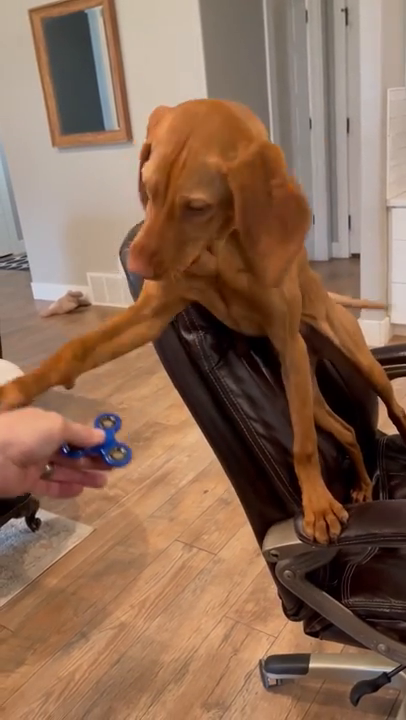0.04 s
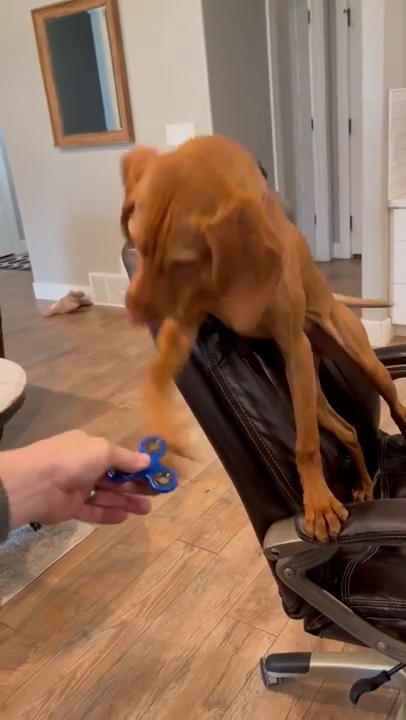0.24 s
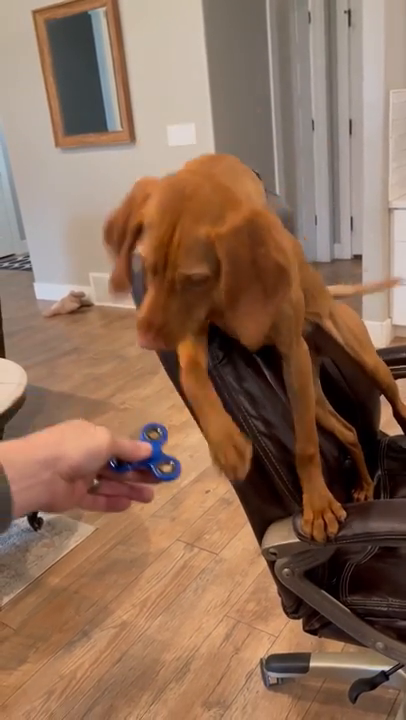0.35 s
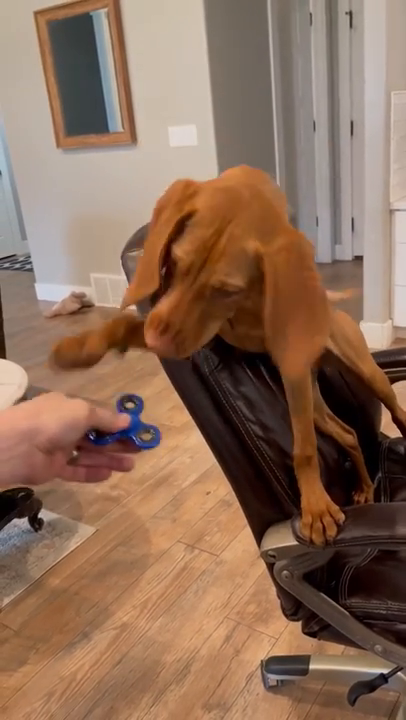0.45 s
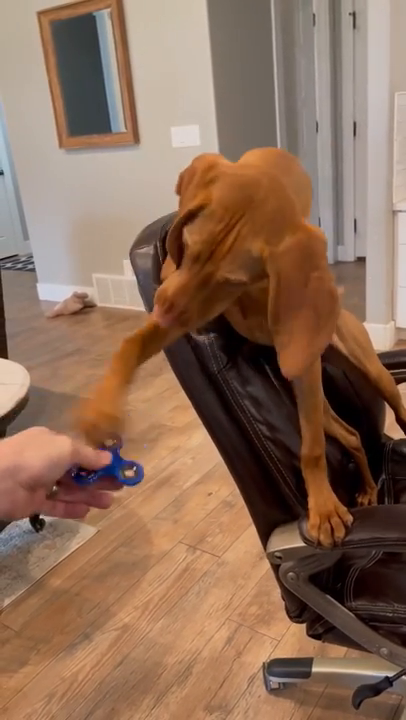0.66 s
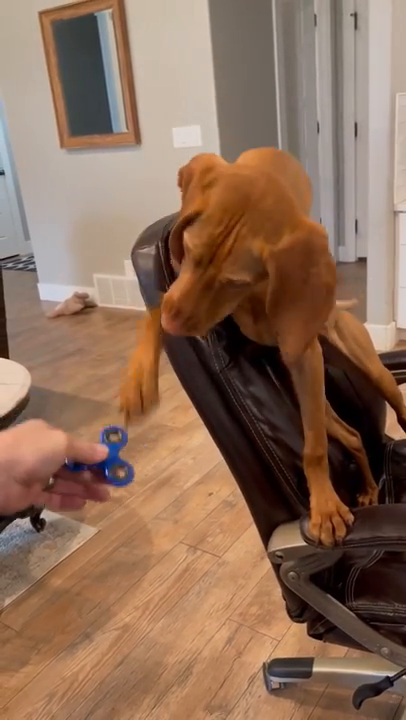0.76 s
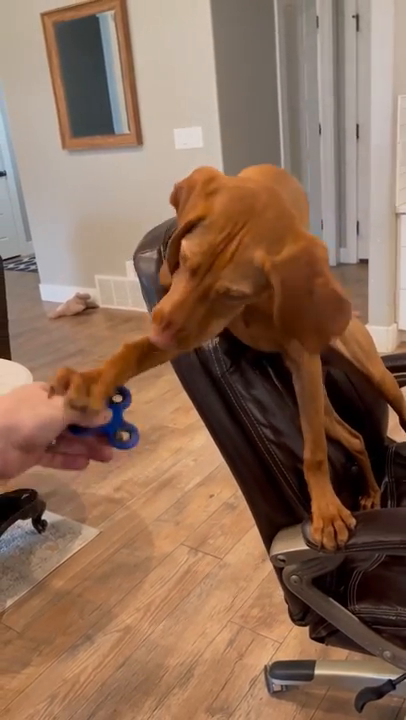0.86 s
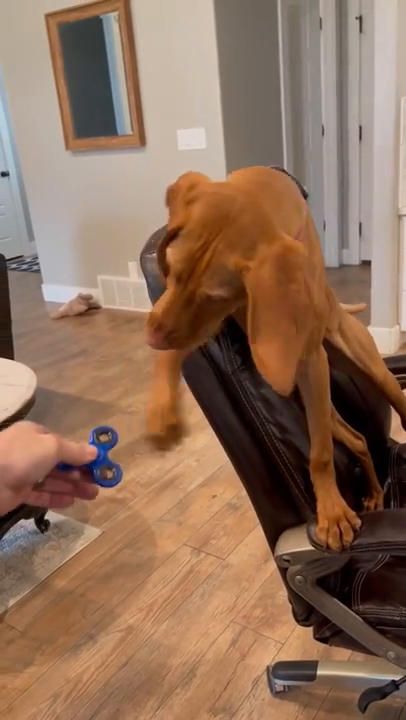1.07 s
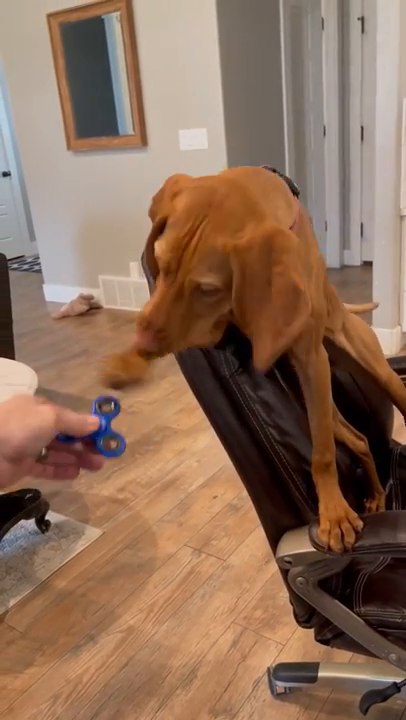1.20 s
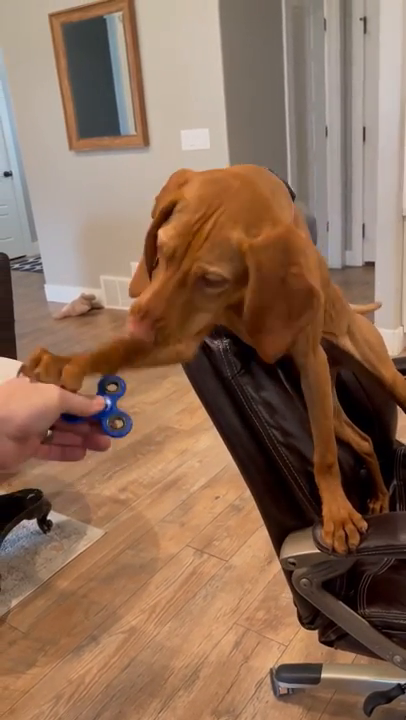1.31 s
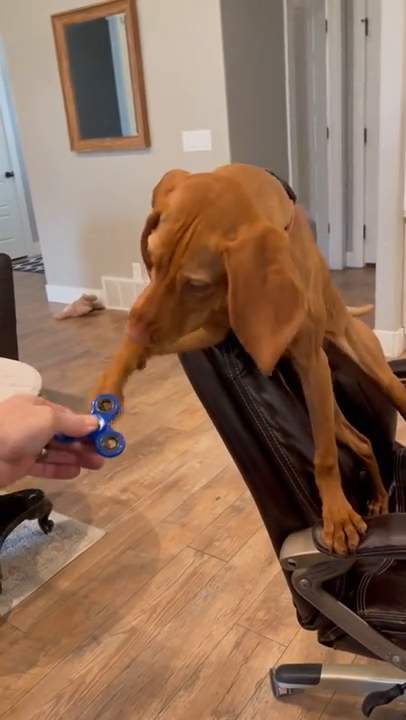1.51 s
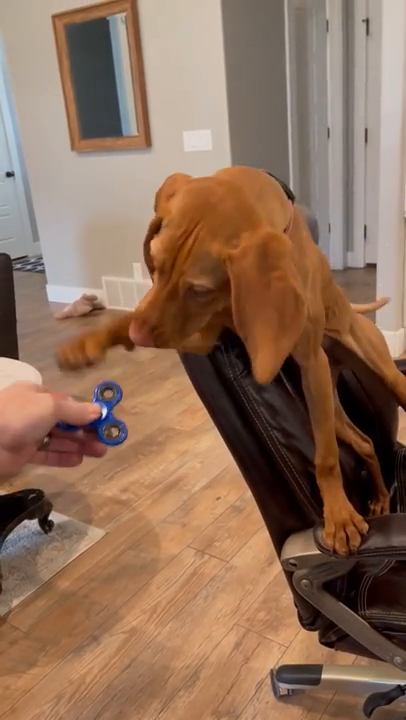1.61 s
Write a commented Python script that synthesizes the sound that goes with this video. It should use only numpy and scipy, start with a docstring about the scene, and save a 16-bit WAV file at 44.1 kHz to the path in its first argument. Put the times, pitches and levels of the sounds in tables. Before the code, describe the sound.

Short, sharp claw taps on a plastic toy, with faint leather rubbing and room noise.

```python
"""Indoors, a fairly live room: a dog on a leather chair bats a small hand-held plastic toy.
Claws skid and click on the plastic in quick clusters, ringing its damped modes; the pads thud softly.
As the dog shifts its weight, the leather rubs and scuffs and the chair frame knocks.
The room carries each click, over a low hum, faint room noise and a thin hiss."""
import sys
import numpy as np
from scipy import signal
from scipy.fft import rfft, irfft
from scipy.io import wavfile
from scipy.ndimage import uniform_filter1d

SR = 44100
rng = np.random.default_rng(int(sys.argv[2]) if len(sys.argv) > 2 else 0)


def store_pcm(level_fs):
    """Save levels as 16-bit WAV."""
    pcm = np.round(np.clip(level_fs, -1, 1) * 32767).astype(np.int16)
    wavfile.write(sys.argv[1], SR, np.atleast_2d(pcm).T)


N = 72765


def undb(db):
    """dB to gain."""
    return 10 ** (np.asarray(db) / 20)


def unit(x):
    """Scale to rms 1."""
    return x / np.sqrt(np.mean(x ** 2))


def fade(t, t60):
    """Exponential decay, 60 dB in t60."""
    return np.exp(-np.log(1000) * np.maximum(t, 0) / t60)


def colour(x, points):
    """Filter by (f/Hz, gain/dB) points."""
    hz, db = np.array(points).T
    f_hz = np.maximum(np.fft.rfftfreq(2 * N, 1 / SR), 1)
    gain = undb(np.interp(np.log(f_hz), np.log(hz), db))
    return irfft(rfft(x, 2 * N) * gain)[..., :N]


def band(x, hz, width_hz):
    """One resonance, applied twice."""
    b, a = signal.iirpeak(hz, hz / width_hz, fs=SR)
    return signal.lfilter(b, a, signal.lfilter(b, a, x))


def cut(x, hz, kind, order=2):
    """Butterworth high-pass or low-pass."""
    return signal.sosfilt(signal.butter(order, min(hz, SR / 3), kind, fs=SR, output="sos"), x)


def curve(points):
    """Gain along (t/s, level/dB) points."""
    return undb(np.interp(np.arange(N) / SR, *np.array(points).T))


def walk(rate_hz):
    """Smooth random wander, rms 1."""
    hold = max(int(SR / rate_hz), 1)
    steps = np.repeat(rng.standard_normal(N)[:N // hold + 1], hold)
    return unit(uniform_filter1d(uniform_filter1d(steps, hold), hold)[:N])


def diffuse():
    """Noise from all around, partly unrelated left and right."""
    # side relative to mid: f/Hz, level/dB
    spread = [(50, -31.5), (150, -17.5), (300, -11), (550, 1), (1000, -6.5), (3000, -12.5)]
    mid, side = rng.standard_normal((2, N))
    side = colour(side, spread)
    return np.array([mid + side, mid - side])


def add(out, start_s, x):
    """Mix x into out at start_s."""
    i = max(int(start_s * SR), 0)
    out[i:i + len(x)] += x[:N - i]


def background():
    """Wavering low hum, dull room noise and a thin hiss that comes and goes."""
    # hum and hiss envelopes: t/s, level/dB
    hum_levels = [(0, -67), (.07, -55.5), (.37, -54), (.44, -61), (.50, -55), (1.65, -54)]
    hiss_levels = [(0, -63.5), (.18, -74), (.45, -92), (.60, -65), (.95, -74), (1.27, -88), (1.40, -61.5),
                   (1.5, -85)]
    # room noise and hiss spectra: f/Hz, level/dB
    floor_spectrum = [(25, -54.5), (70, 4), (110, -9.5), (200, -7.5), (330, -12), (450, -44.5),
                      (900, -35.5), (2500, -58)]
    hiss_spectrum = [(1000, -33), (4000, -2.5), (6500, -0.5), (8500, -1), (10500, 12), (11500, -4),
                     (13000, -28.5)]
    hum_hz, wander_hz, waver_db, floor_db = 57.27, 0.6, 1.76, -64.5
    phase = 2 * np.pi * np.cumsum(hum_hz + wander_hz * walk(rate_hz=8.26)) / SR
    hum = curve(hum_levels) * undb(waver_db * walk(rate_hz=23)) * np.sqrt(2) * np.sin(phase)
    floor = undb(floor_db) * unit(colour(diffuse(), floor_spectrum))
    hiss = curve(hiss_levels) * unit(colour(diffuse(), hiss_spectrum))
    return hum + floor + hiss


def leather_rub():
    """Grainy rubbing as the dog shifts its weight."""
    # rub envelope: t/s, level/dB
    levels = [(0, -62.5), (.18, -69.5), (.31, -54), (.46, -63.5), (.60, -65.5), (.69, -54), (.82, -70.5),
              (.97, -74), (1.04, -58), (1.31, -63), (1.42, -59), (1.55, -72)]
    # rub spectrum: f/Hz, level/dB
    spectrum = [(100, 6), (300, 8.5), (500, -1), (800, -1), (1300, -4.5), (2400, -11), (5000, -21.5),
                (10000, -19), (13000, -49.5)]
    grain_db = 1.5
    grains = diffuse() * undb(grain_db * walk(rate_hz=190))
    return curve(levels) * unit(colour(grains, spectrum))


def claw_skids():
    """A claw tip catches and slips on the plastic: a brief swell of fine, bright grains."""
    # skids: middle t/s, Gaussian sigma/s, level/dB, centre f/Hz
    skids = [(0.202, 0.0046, -51, 8560), (0.5047, 0.0026, -44, 10080), (0.643, 0.0039, -48.5, 9450),
             (0.974, 0.0074, -63, 5440), (1.007, 0.0079, -45.5, 7840), (1.049, 0.011, -49.5, 9600),
             (1.298, 0.0055, -54, 9700)]
    grain_db = 5.5
    t, out = np.arange(N) / SR, 0
    for middle_s, sigma_s, db, hz in skids:
        grains = rng.standard_normal(N) * undb(grain_db * walk(rate_hz=900))
        swell = np.exp(-0.5 * ((t - middle_s) / sigma_s) ** 2)
        out += undb(db) * unit(band(grains, hz, width_hz=7800)) * swell
    return cut(out, 12500, "lowpass", order=6)


def claw_clicks():
    """Each bright contact rings the toy's body and the struck spot. Returns direct sound, room feed."""
    # clicks: t/s, level/dB, contact f/Hz, contact t60/ms, relative body level/dB, spot f/Hz
    clicks = [(.2163, -5.5, 10100, 1.1, -16, 8800), (.2218, -24, 9100, 1.8, -8, 2250),
              (.2414, -17, 8840, 1, -17, 6650), (.2468, -13, 9440, 0.83, -16, 8800),
              (.3780, -19.5, 10100, 2.85, -9.5, 4220), (.4805, -17, 10040, 0.82, -17.5, 11700),
              (.5021, -27, 8800, 1.8, -14.5, 6500), (.6498, -10.5, 10300, 1, -6.5, 7300),
              (.6522, -5, 9080, 1.2, -20, 8400), (.6556, -22, 7640, 0.88, -7, 4200),
              (.8502, -22, 8900, 1.5, -14, 6100), (.8716, -15, 8700, 2.5, -27.5, 5740),
              (.8718, -18.5, 10700, 1.75, -16.5, 10800), (.8746, -22, 10000, 0.9, -15, 6300),
              (.927, -22, 8800, 0.63, -19, 6300), (1.0118, -8.5, 7500, 0.31, -11, 4010),
              (1.0176, -18, 7430, 2.1, -16.5, 6900), (1.0191, -12.5, 9760, 1.4, -31.5, 10200),
              (1.0537, -21, 10260, 1.1, -11, 7370), (1.3122, -28, 9500, 1.2, -15, 5730),
              (1.4035, -30, 5850, 1.3, -22, 4300)]
    # plastic toy modes: f/Hz, level/dB, t60/ms
    modes = [(1140, -18, 3.5), (2130, -23, 6.1), (4050, -24, 3), (4770, -13, 2.8), (5600, -14, 1.9),
             (7030, -6.5, 1.8), (8250, -11, 8.5), (10290, -12.5, 9.2)]
    contact_gain, spot_db, spot_t60_ms = 0.48, -29, 22
    firm_cut_hz, firm_db, db_per_octave = 646, -6, 12
    contact_send_db, body_send_db = -7, 3
    t = np.arange(SR // 40) / SR
    t_ms = 1000 * t
    toy = sum(undb(db) * fade(t_ms, t60_ms) * np.cos(2 * np.pi * hz * t) for hz, db, t60_ms in modes)
    direct, feed = np.zeros((2, N))
    for start_s, db, hz, t60_ms, body_db, spot_hz in clicks:
        # lighter touches stir less of the low modes
        cut_hz = firm_cut_hz * 2 ** ((firm_db - db - body_db) / db_per_octave)
        swell = t_ms * fade(t_ms, t60_ms)
        contact = undb(db) * contact_gain * swell / swell.max() * np.cos(2 * np.pi * hz * t)
        contact = cut(contact, cut_hz, "highpass")
        body = undb(db + body_db) * cut(toy, cut_hz, "highpass")
        spot = undb(db + spot_db) * fade(t_ms, spot_t60_ms) * np.cos(2 * np.pi * spot_hz * t)
        add(direct, start_s, contact + body + spot)
        add(feed, start_s, (contact + spot) * undb(contact_send_db) + body * undb(body_send_db))
    return direct, feed


def chair_knocks():
    """The chair catches and lets go in small knocks that ring its damped frame."""
    # knocks: t/s, level/dB, contact f/Hz, relative frame level/dB
    knocks = [(0.2922, -41, 940, -14.5), (0.2972, -38, 875, -5.5), (0.3486, -48.5, 1140, -11),
              (0.35, -45.5, 680, 2)]
    # frame modes: f/Hz, level/dB, t60/s
    modes = [(178.3, -5.5, 0.06), (324, -2, 0.016), (980, -17.5, 0.021), (1164, -10, 0.024)]
    t, out = np.arange(SR // 8) / SR, np.zeros(N)
    frame = sum(undb(db) * fade(t, t60_s) * np.sin(2 * np.pi * hz * t) for hz, db, t60_s in modes)
    swell = t * fade(t, t60=0.002)
    for start_s, db, hz, frame_db in knocks:
        contact = swell / swell.max() * np.sin(2 * np.pi * hz * t)
        add(out, start_s, undb(db) * (contact + undb(frame_db) * frame))
    return out


def leather_scuffs():
    """The leather slips under the dog in short, dull scuffs."""
    # scuffs: t/s, level/dB, centre f/Hz, resonance width/Hz, t60/s
    scuffs = [(0.348, -49.5, 264, 404, 0.18), (1.341, -58.5, 1590, 1160, 0.14)]
    attack_s = 0.002
    t, out = np.arange(N) / SR, 0
    for start_s, db, hz, width_hz, t60_s in scuffs:
        envelope = np.clip((t - start_s) / attack_s, 0, 1) * fade(t - start_s, t60_s)
        out += undb(db) * unit(band(diffuse(), hz, width_hz)) * envelope
    return out


def pad_thuds():
    """The soft weight of the paw: a few low, damped cycles."""
    # thuds: t/s, level/dB, f/Hz, t60/s
    thuds = [(0.656, -50.5, 355, 0.026), (0.677, -40, 136.3, 0.023), (1.0226, -41.5, 125, 0.035)]
    attack_s = 0.00048
    t, out = np.arange(SR // 4) / SR, np.zeros(N)
    for start_s, db, hz, t60_s in thuds:
        envelope = (1 - np.exp(-t / attack_s)) * fade(t, t60_s)
        add(out, start_s, undb(db) * np.sin(2 * np.pi * hz * t) * envelope)
    return out


def room(x):
    """Quick scatter off hand, dog and chair, then a diffuse tail that dies soonest at the top."""
    # tail bands: f/Hz, t60/s, level/dB
    bands = [(297, 0.47, 6.5), (1025, 0.38, 4), (2600, 0.37, 0.5), (4640, 0.5, -4), (6950, 0.4, 0.5),
             (11200, 0.26, 3), (13450, 0.24, -4.5)]
    tail_db, build_s = -8, 0.0078
    early_db, early_t60_s, grain_db = -5, 0.026, 4.5
    t, tail = np.arange(N) / SR, 0
    log_f = np.log(np.maximum(np.fft.rfftfreq(2 * N, 1 / SR), 1))
    log_centres = np.log([row[0] for row in bands])
    spectrum = rfft(diffuse(), 2 * N)
    for share, (_, t60_s, db) in zip(np.eye(len(bands)), bands):
        band_noise = irfft(spectrum * np.interp(log_f, log_centres, share))[:, :N]
        tail += undb(db) * fade(t, t60_s) * band_noise
    tail *= 1 - np.exp(-t / build_s)
    early = diffuse() * undb(grain_db * walk(rate_hz=1500)) * fade(t, early_t60_s)
    response = (undb(tail_db) * unit(tail) + undb(early_db) * unit(early)) / np.sqrt(N)
    return signal.fftconvolve(x[None], response, axes=1)[:, :N]


def scene():
    """Clicks, skids, thuds and knocks in the room, plus leather and background."""
    weight_send_db = -3.5
    clicks, click_feed = claw_clicks()
    skids = claw_skids()
    weight = pad_thuds() + chair_knocks()
    reverb = room(click_feed + skids + undb(weight_send_db) * weight)
    return clicks + skids + weight + reverb + leather_scuffs() + leather_rub() + background()


def record(dry):
    """Left is slightly louder and leads in the treble; the top is cut steeply."""
    # lead of left over right: f/Hz, phase/rad
    lead = [(2000, 0), (4000, .7), (4900, 3.1), (5500, 5.9), (6200, 6.3), (9100, 9.4), (12000, 12.4),
            (13300, 12.7), (15200, 15.7)]
    balance_db, top_hz = 0.35, 16200
    lead_rad = np.interp(np.fft.rfftfreq(2 * N, 1 / SR), *np.array(lead).T)
    sides = np.array([[0.5], [-0.5]])
    shifted = irfft(rfft(dry, 2 * N) * np.exp(1j * sides * lead_rad))[:, :N]
    top_cut = signal.ellip(8, 0.2, 70, top_hz, fs=SR, output="sos")
    return signal.sosfilt(top_cut, shifted * undb(sides * balance_db))


dry = scene()
out = record(dry)
store_pcm(out)
```